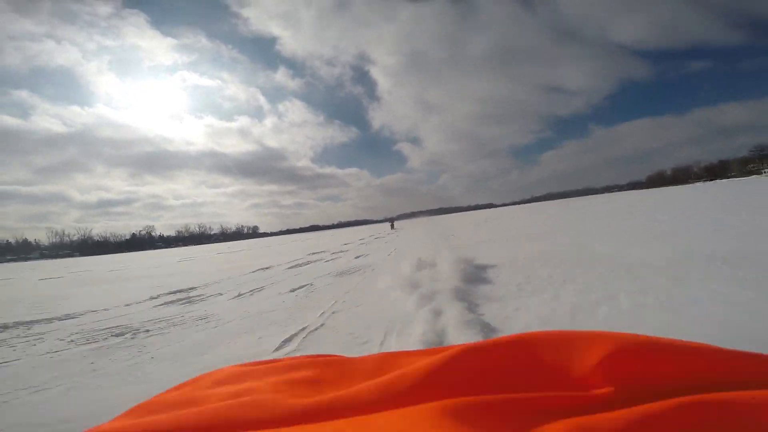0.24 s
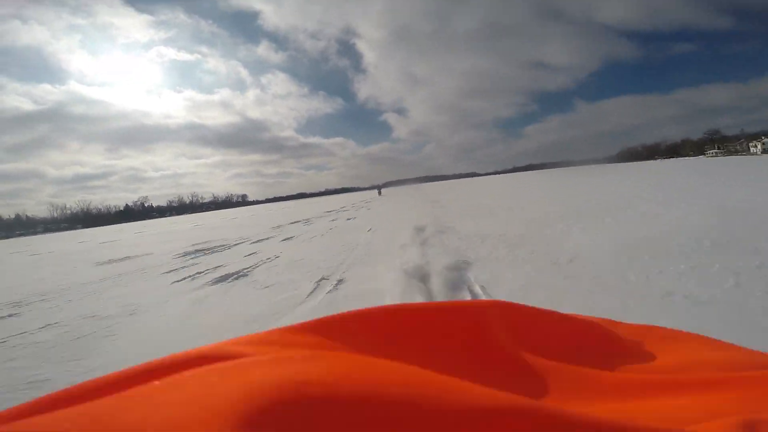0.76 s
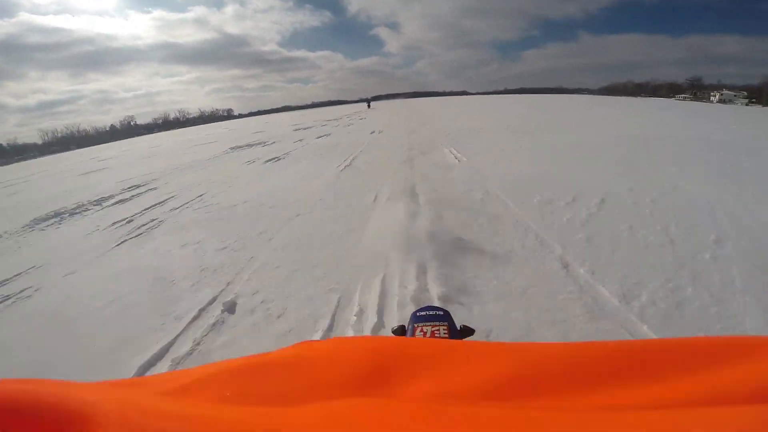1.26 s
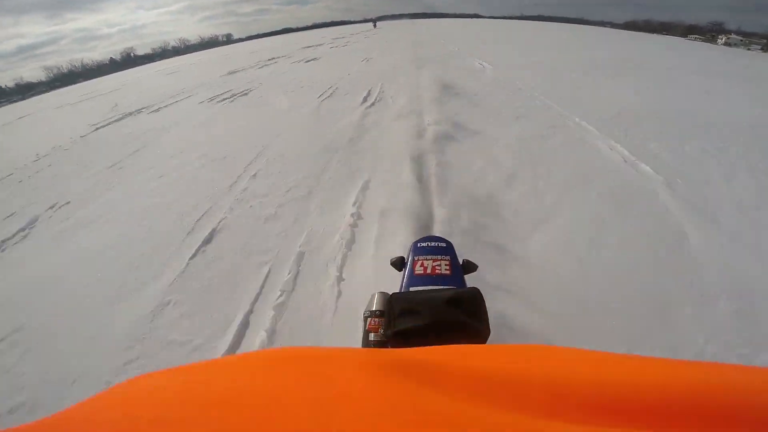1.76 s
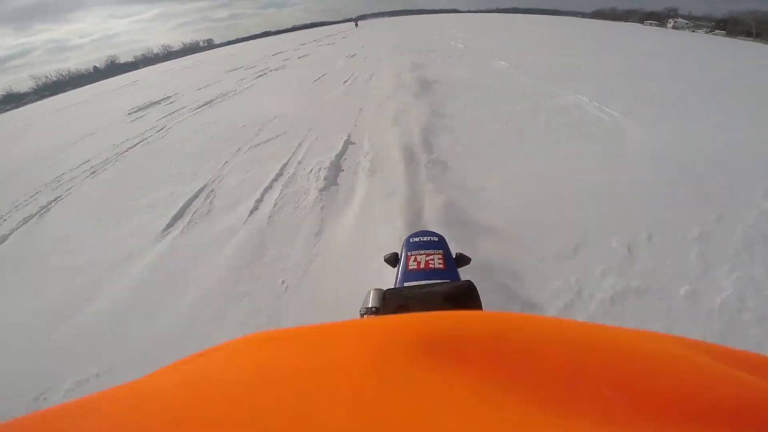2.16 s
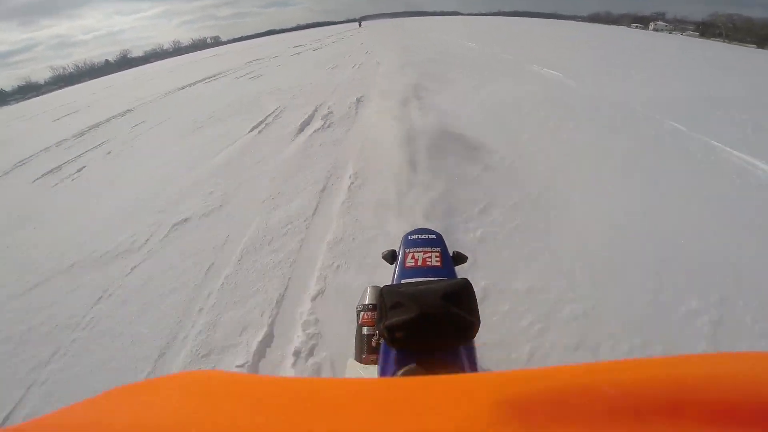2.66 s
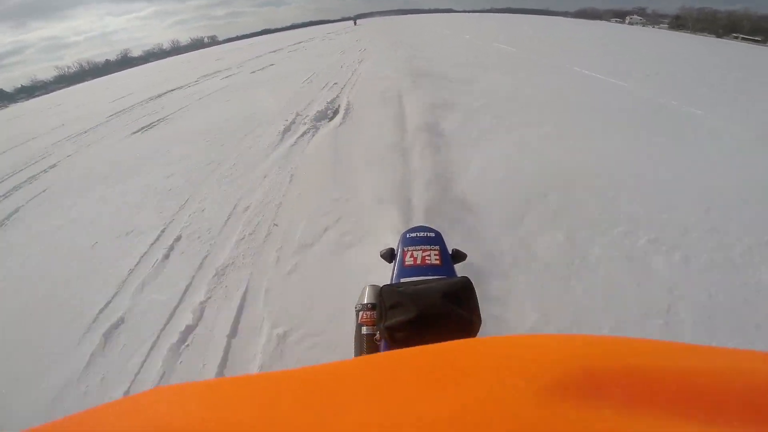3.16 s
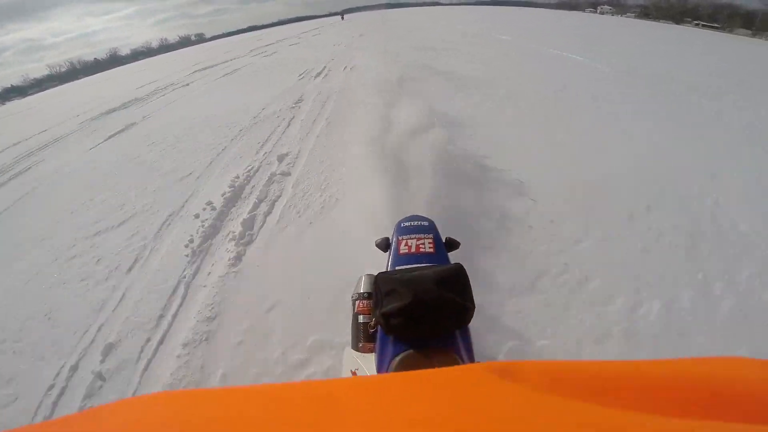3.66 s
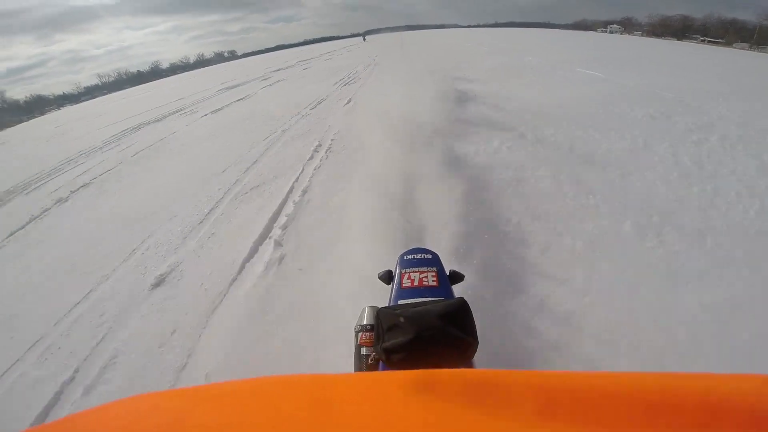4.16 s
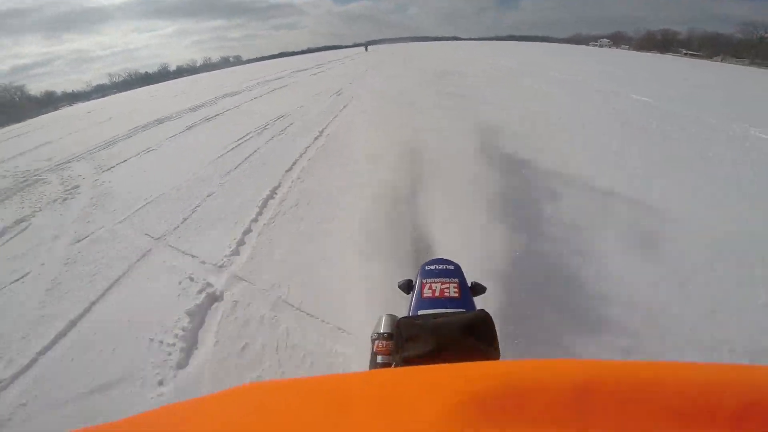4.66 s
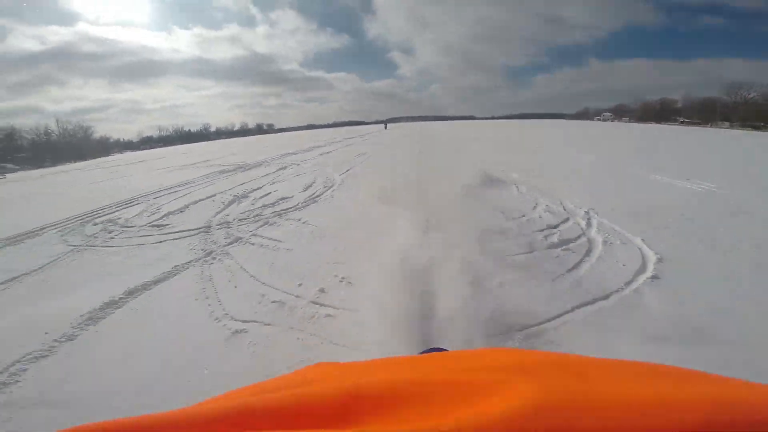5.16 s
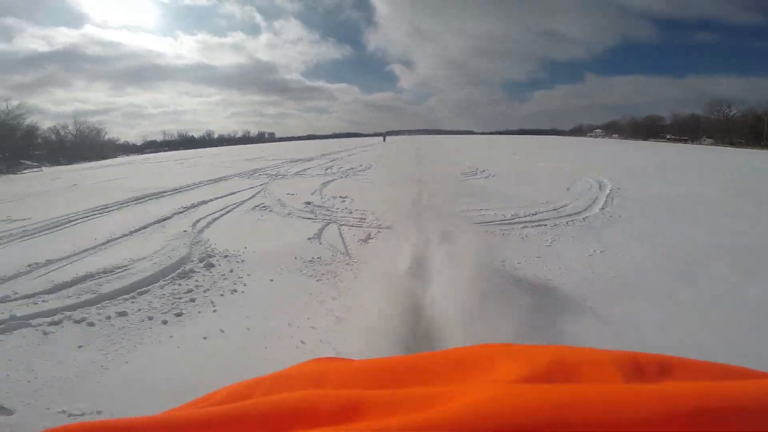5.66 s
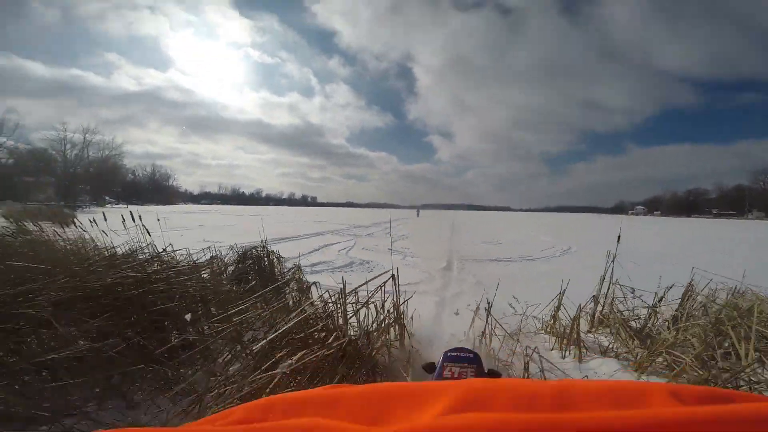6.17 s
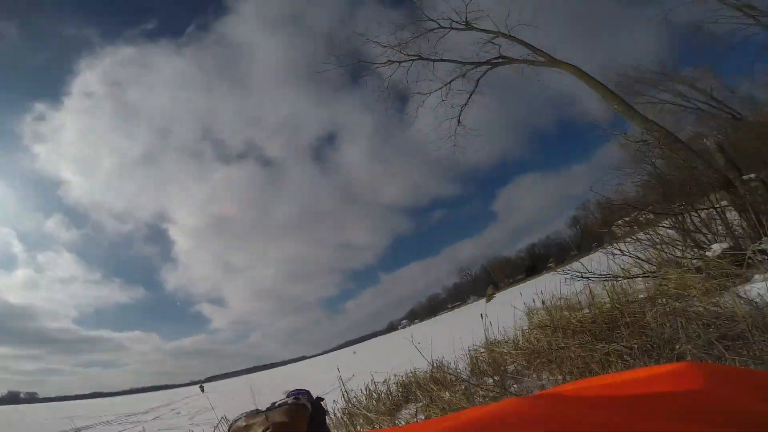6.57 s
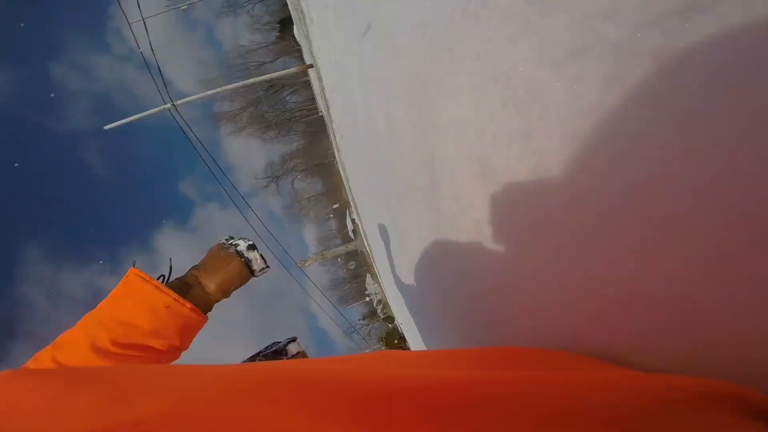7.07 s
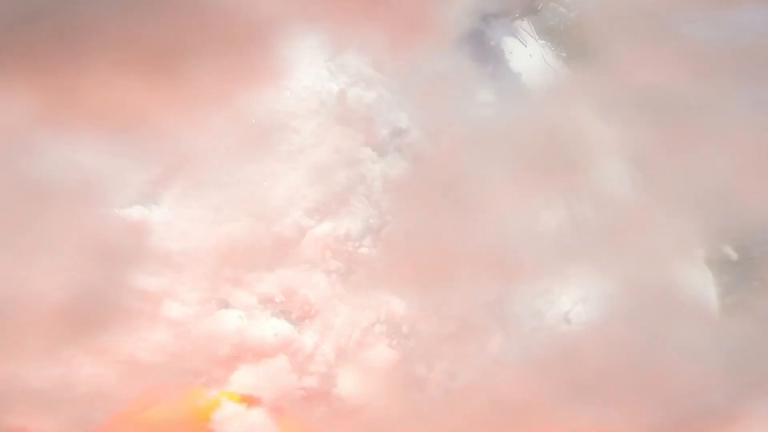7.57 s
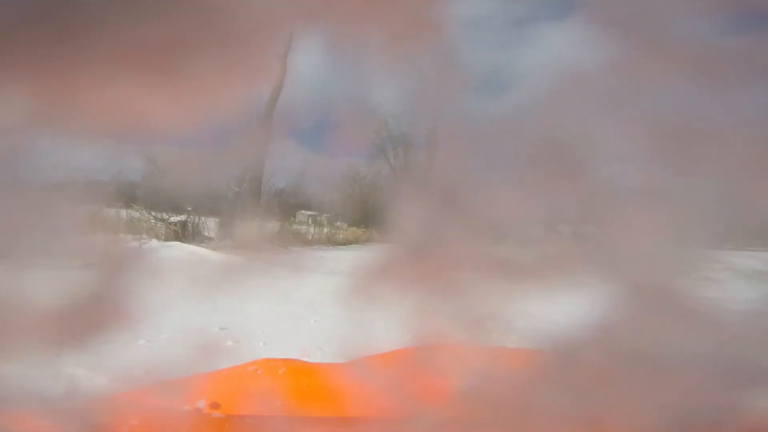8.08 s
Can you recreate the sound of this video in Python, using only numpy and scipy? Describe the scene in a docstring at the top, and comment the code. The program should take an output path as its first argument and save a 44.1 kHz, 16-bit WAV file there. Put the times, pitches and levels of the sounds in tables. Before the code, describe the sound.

Heavy wind buffets a microphone worn on the back of a rider coasting a small motorbike across a frozen lake. A stiff jacket crackles, something loose taps the plastic case, and snow hisses under the tyres. The wind eases, the engine putters and revs up, and dry reeds swish past. Sharp knocks and a short groan lead to a crunching fall into snow and a fading slide.

```python
"""Motorbike fall on a frozen lake

A small motorbike coasts fast over snowy ice, a cased camera on the rider's back. Turbulent air buffets
the case, the jacket rubs it, snow sprays on it and something loose taps it, exciting its modes.
The engine's firings quicken and ring the exhaust pipe as the bike jolts through the reeds of the bank.
The rider is thrown, lands in snow whose crust fractures in many small snaps, and slides to rest."""
import sys
import numpy as np
from scipy import signal
from scipy.fft import rfft, irfft, next_fast_len
from scipy.io import wavfile
from scipy.ndimage import uniform_filter1d, map_coordinates

SR = 44100
rng = np.random.default_rng(int(sys.argv[2]) if len(sys.argv) > 2 else 0)


def materialize(psi):
    """Save the field psi as 16-bit PCM at rate SR to the path in sys.argv[1].

    A 1-D psi becomes a single channel; in a 2-D psi each row is a channel.
    """
    bounded = np.clip(np.atleast_2d(psi).T, -1, 1)
    quanta = np.round(bounded * 32767).astype(np.int16)
    wavfile.write(sys.argv[1], SR, quanta)


N = 367217
TIME = np.arange(N) / SR
LANDING_S = 7.186

# Airflow over the case, dropping as the bike slows: time_s, level_db
AIRFLOW = [(0, -21.5), (.75, -15), (1.12, -21), (1.5, -16.5), (1.95, -18), (2.75, -14.5), (3.1, -18.5),
           (3.5, -23), (3.85, -30), (4.7, -36), (5.35, -39), (5.78, -43.5), (6.22, -27.5), (6.52, -42.5),
           (7.35, -43.5), (7.85, -59.5), (8.33, -48)]
# Lurches of the rider that push air at the case: centre_s, level_db, half_width_s
LURCHES = [(4.844, -22.5, 0.21), (5.16, -16, 0.044), (5.67, -26.5, 0.099), (6.166, -24, 0.081),
           (7.065, -28.5, 0.18), (7.456, -20.5, 0.026), (7.67, -30, 0.024), (8.194, -27.5, 0.088)]
# Slaps and lulls of large eddies: centre_s, gain_db
SLAPS = [(.04, 11), (.068, -12), (1.52, 11.5), (1.77, 4.5), (2.4, 2.5), (3.053, 7.5), (3.511, 13.5),
         (5.15, 7)]
# Spectra of the turbulence: frequency_hz, relative_db
GUST_SPECTRUM = [(8, -5), (18, 3.5), (35, -3), (55, -11), (90, -20.5), (200, -88.5)]
EDDY_SPECTRUM = [(22, -18), (40, -5.5), (65, 0), (100, 0), (150, 2.5), (200, -6.5), (260, -15),
                 (340, -14.5), (480, -27.5), (700, -58), (1500, -83)]

# Modes of the case, its hollow mount and the exhaust pipe: pitch_hz, level_db, t60_s
CASE_MODES = [(277, -5, 0.017), (422, -10.5, 0.018), (590, -22.5, 0.027), (1126, -22.5, 0.017),
              (1410, -13, 0.019), (1643, 1, 0.0035), (2160, -20, 0.12), (2250, -15.5, 0.022),
              (2276, -1.5, 0.011), (2680, -15.5, 0.023), (3070, -5, 0.0061), (4700, -13.5, 0.0063),
              (5890, -11, 0.0036), (10200, -21.5, 0.0018), (11540, -25, 0.0033)]
MOUNT_MODES = [(124.6, 0.5, 0.1), (296, 2.5, 0.079), (827, -4.5, 0.058)]
PIPE_MODES = [(135, -9, 0.04), (271, 3, 0.03), (445, -3, 0.023), (570, -14, 0.019)]
# Heavy jolts and the knocks of the fall:
# start_s, level_db, thud_db, clack_db, snap_db, mount_db, wall_hz, wall_db, wall_t60_s
JOLTS = [(.938, -15.5, 4, 19.5, 0, -30, 1160, -25, 0.0054),
         (5.125, -13, -18, 0.5, -5, -34, 3230, -22, 0.028), (5.457, -32.5, 19, 9, -2, -36, 1400, -44, .02),
         (6.2138, -16.5, 18.5, 10, -18, -21.5, 1900, -15, 0.023),
         (6.3138, -7.5, -6, 8, -7, -15, 1380, -4, 0.023), (6.4147, -4.5, 6, 6.5, -6, -24, 1970, -12, 0.024),
         (6.422, -21, 1, 12, -14, -31, 1230, -23, 0.044),
         (6.7053, -14.5, 7, 4.5, -35, -37, 2050, -12.5, 0.021),
         (6.716, -16, -10, 8, -30, -35, 2160, -18.5, 0.053),
         (6.9847, -18.5, -2, 5, -19, -38, 1870, -3, 0.0085),
         (7.0372, -5, -2, 4.5, -11, -17, 1580, -17, 0.038),
         (7.155, 0.5, -1, -6.5, -14.5, -21, 2120, -13, 0.0086),
         (7.2019, -0.5, -14, 0, 9, -35, 1960, -17, 0.012), (7.2028, -11, 12, 18, 21, -38, 2480, -2, 0.027),
         (7.4363, -7.5, 4, 4, 1, -30, 2240, 2, 0.0048), (7.633, -25.5, 2, 10, 3, -50, 2470, -21, 0.016)]
# Something loose tapping the case: start_s, level_db, snap_db
TAPS = [(.677, -9.5, 3), (1.193, -17.5, -3), (1.561, -13.5, -8), (1.621, -19.5, -18), (1.669, -18, -17),
        (1.7145, -15.5, -15), (1.782, -16.5, 3), (1.822, -20.5, -19), (1.870, -14.5, -20),
        (1.933, -18.5, 6), (1.975, -12, -12), (2.046, -25.5, 1), (2.092, -10, -12), (2.2548, -12, 3.5),
        (2.3086, -13, -4), (2.415, -14.5, 1), (5.181, -23.5, 4)]
# Ice chips striking the case: start_s, level_db
ICE_CHIPS = [(4.8683, -31), (4.9717, -35), (5.0092, -37), (5.2696, -38), (5.3205, -45), (5.3319, -32.5),
             (5.3363, -23), (5.35, -40), (5.447, -36), (5.7384, -29), (5.752, -40), (5.811, -36),
             (5.816, -28.5), (7.528, -30.5), (7.808, -40), (7.8864, -34.5)]

# Speed of the single-cylinder engine: time_s, firing_rate_hz
FIRING_RATE = [(5.653, 13.7), (5.79, 16.5), (5.895, 21.8), (6.01, 30.2), (6.14, 38), (6.22, 44),
               (6.35, 45.5), (6.85, 36)]
# Strength of the exhaust pulses: time_s, level_db
THROTTLE = [(5.65, -35.5), (5.845, -24.5), (6.19, -18.5), (6.25, -21), (6.41, -27), (6.46, -44), (7.2, -43)]
# Spectrum of a puff of exhaust gas: frequency_hz, relative_db
PUFF_SPECTRUM = [(100, -15), (250, -10), (490, -5), (620, -20), (950, -39)]

# The rider's weight packing the snow at each bounce and roll: start_s, level_db, hold_s
BOUNCES = [(7.195, -15.5, 0.0054), (7.196, -26, 0.0033), (7.244, -22, 0.058), (7.399, -33, 0.07),
           (7.603, -46.5, 0.025), (8.005, -46.5, 0.1), (8.112, -34, 0.021), (8.18, -40.5, 0.02)]
# Spectra of breaking crust, powder and the body's thump: frequency_hz, relative_db
CRUST_SPECTRUM = [(100, -9.5), (270, -4.5), (600, -16.5), (1000, -9.5), (1500, -4.5), (2150, 0),
                  (3000, -10), (4400, -15.5), (6000, -14), (8000, -26), (15000, -29)]
POWDER_SPECTRUM = [(3000, 3), (6500, 4), (10000, -1), (15000, -13)]
THUMP_SPECTRUM = [(30, 4.5), (80, -1), (140, 3.5), (230, -6.5), (300, -2.5), (480, -16.5), (900, -60)]

# Single rubs of the jacket on the case: centre_s, level_db, length_s
RUBS = [(1.148, -25.5, 0.012), (1.214, -22.5, 0.017), (1.266, -36, 0.04), (1.457, -25.5, 0.024),
        (1.578, -27, 0.016), (2.849, -37, 0.039), (3.207, -32.5, 0.04), (3.232, -31.5, 0.017),
        (3.358, -35, 0.06), (3.469, -34, 0.081), (3.74, -37, 0.044), (3.825, -34, 0.052),
        (3.883, -35.5, 0.062), (3.954, -31.5, 0.078), (4.865, -40, 0.043), (4.93, -33, 0.033),
        (4.987, -41, 0.027), (5.061, -37, 0.058), (5.25, -40.5, 0.075), (6.355, -38, .016),
        (6.413, -25.5, 0.03), (7.111, -26.5, 0.017)]
# Stiff folds snapping against the case: start_s, level_db
FOLD_SNAPS = [(0.4952, -22), (.5633, -26), (.7429, -21), (0.8603, -20), (.896, -14), (1.0341, -17),
              (1.098, -24), (1.1932, -16.5), (1.249, -18), (1.302, -24.5), (1.348, -25), (1.364, -24),
              (1.427, -17), (1.4497, -23), (1.4707, -25)]
# Spectra of flapping and rubbing cloth: frequency_hz, relative_db
FLAP_SPECTRUM = [(150, 3.5), (300, 8.5), (430, 3), (600, -4.5), (1080, -10), (1420, 1), (1900, -1.5),
                 (2150, -0.5), (2450, -2.5), (3300, -7.5), (4250, -18), (4650, -19), (5100, -22.5),
                 (5780, -13), (7100, -21), (8200, -27), (10000, -24.5), (15000, -41)]
RUB_SPECTRUM = [(500, -28), (1080, -10), (1400, 9.5), (1800, 4), (2150, 2), (2600, 2.5), (3300, -1.5),
                (4100, -14.5), (5200, -23), (5950, -10), (7000, -26), (12000, -46)]

# Groan of the riderless bike ploughing into the bank: time_s, level_db, pitch_hz
GROAN = [(6.85, -55, 259), (6.97, -46, 255), (6.99, -36, 268), (7.03, -22, 295), (7.065, -35, 286),
         (7.085, -33, 314), (7.125, -28, 344), (7.148, -66, 340)]
# Dry reeds sweeping along bike and case: time_s, level_db
REED_SWEEP = [(5.75, -83), (5.9, -51.5), (6.02, -42.5), (6.17, -33.5), (6.24, -38.5), (6.28, -31),
              (6.33, -39), (6.4, -38), (6.48, -63)]
# Spectra of scratching reeds and a skidding tyre: frequency_hz, relative_db
REED_SPECTRUM = [(590, -8), (1000, -8.5), (1560, -0.5), (1950, -1), (2260, -0.5), (2600, -8), (3100, -5),
                 (3850, -16.5), (4620, -12.5), (5170, -19), (6060, -10.5), (7000, -21), (7950, -30),
                 (8800, -23), (10000, -23), (15000, -37)]
SKID_SPECTRUM = [(250, -18), (430, 5), (530, 11.5), (650, 7), (780, 3), (1150, -5), (1430, -3), (2200, -7),
                 (3700, -16), (4600, -9), (5300, -19), (6800, -12), (8100, -34), (10000, -35), (15000, -56)]

# Tyres running through snow: time_s, roar_db, spray_db
SNOW_RUN = [(1.7, -45.5, -44), (2.65, -43.5, -38.5), (3.0, -38.5, -42.5), (3.45, -43.5, -43),
            (3.85, -43, -45.5), (4.1, -41, -49.5), (4.75, -49, -51.5), (5.08, -44, -48.5),
            (5.33, -51, -49.5), (5.8, -54.5, -50.5), (6.7, -58.5, -51), (6.95, -59, -45),
            (7.08, -58, -38.5)]
# Brushes through drifts: start_s, end_s, hiss_db, fizz_db
DRIFTS = [(3.626, 3.67, -65, -46.5), (4.923, 5.218, -60, -63)]
# Spectra of tyre roar, coarse spray and fine spray: frequency_hz, relative_db
ROAR_SPECTRUM = [(150, -6.5), (300, 4), (520, 0), (680, -3), (850, -3.5), (1100, -16), (1800, -69),
                 (4000, -83)]
HISS_SPECTRUM = [(500, -20), (1080, -2), (1380, 4.5), (1800, 4), (2130, 3), (2500, -2), (3000, -5),
                 (3900, -13), (4600, -10.5), (5200, -21.5), (5950, -11), (7000, -18), (8000, -28.5),
                 (12000, -54)]
FIZZ_SPECTRUM = [(2500, -17), (5000, 7.5), (6800, -3), (8300, -9), (10000, -5), (12500, -11.5),
                 (15000, -17)]


def wind(suction=0.09, lumpy_db=3, gust_over_db=8, gust_limit_db=-23.5, slap_half_s=0.015):
    """Turbulence: slow gusts and eddies shed by the rider vary the pressure on the case."""
    gusts = steadied(noise(GUST_SPECTRUM), size=6000)
    eddies = noise(EDDY_SPECTRUM) * gain_of(lumpy_db * (wander(rate_hz=14) + wander(rate_hz=47)))
    eddies = steadied(eddies, size=6000)
    eddies = unit_rms(eddies - suction * (eddies ** 2 - 1))  # suction peaks are the sharper ones
    airflow = gain_of(follow(AIRFLOW))
    gusting = 1 / (1 / (airflow * gain_of(gust_over_db)) + 1 / gain_of(gust_limit_db))
    lurching = sum(gain_of(db) * np.exp(-((TIME - s) / half) ** 2) for s, db, half in LURCHES)
    slaps_db = sum(db * np.exp(-((TIME - s) / slap_half_s) ** 2) for s, db in SLAPS)
    pressure = gusts * np.hypot(gusting, lurching) + eddies * gain_of(slaps_db) * airflow
    return np.tanh(pressure)  # strong wind overloads the microphone, softly flattening the peaks


def impacts(chatter=0.075, chatter_s=0.0035, boost_db=2.5, wall_rise_s=0.00093, size=8192):
    """Impulse excitation: a push and brief chatter ring the case, its mount and often one wall."""
    out, t = np.zeros(N), np.arange(size) / SR
    # Light strikes, in the columns of JOLTS, hardly stir the mount; chips ring no wall.
    taps = [(s, db, -19, 2.5, snap_db, -80, 2175, db - 4.5, 0.016) for s, db, snap_db in TAPS]
    chips = [(s, db, -18, -46, 16, -80) for s, db in ICE_CHIPS]
    for s, db, thud_db, clack_db, snap_db, mount_db, *wall in JOLTS + taps + chips:
        # Each point of contact weights the modes differently.
        case = ring([(hz, level + rng.standard_normal(), t60) for hz, level, t60 in CASE_MODES])
        if s > LANDING_S:
            case *= np.exp(-t / 0.0032)  # damped by packed snow
        elif s < FIRING_RATE[0][0]:
            case *= np.exp(-t / 0.046)  # damped by the rider's back
        push = (t == 0) + chatter * rng.standard_normal(size) * np.exp(-t / chatter_s)
        struck = unit_rms(signal.fftconvolve(push, case)[:size]) * case.std()
        tone = [(450, thud_db), (900, clack_db - 0.5), (1400, clack_db), (2000, 0), (4500, 0),
                (8500, snap_db), (16000, snap_db)]
        knock = gain_of(db + boost_db) * toned(struck, tone) / abs(case).max()
        add(out, s, knock + gain_of(mount_db) * ring(MOUNT_MODES))
        if wall:
            add(out, s, ring([wall]) * (1 - np.exp(-t / wall_rise_s)))
    return out


def engine(stall_s=7.25, uneven_db=0.5, puff_db=-15, puff_s=0.0061, echo=0.45, echo_s=0.00633):
    """Pipe resonance: each firing rings the exhaust, reflects inverted from its end and puffs out gas."""
    running = (TIME >= FIRING_RATE[0][0]) & (TIME < stall_s)
    cycles = np.cumsum(follow(FIRING_RATE) * running) / SR
    strength = gain_of(follow(THROTTLE) + uneven_db * rng.standard_normal(N))
    firings = np.diff(np.ceil(cycles), prepend=0) * strength
    pulses = firings - echo * np.roll(firings, round(echo_s * SR))
    muffled_pipe = toned(ring(PIPE_MODES), [(520, -15), (900, -7), (2500, -19)])
    knocks = signal.oaconvolve(pulses, muffled_pipe / abs(muffled_pipe).max())[:N]
    outflow = signal.lfilter([1], [1, -np.exp(-1 / (puff_s * SR))], firings)
    return knocks + gain_of(puff_db) * outflow * noise(PUFF_SPECTRUM)


def snow_crunch(slide_db=-40, slowing_db_per_s=64, creak_db=-53.5, thump_db=-16):
    """Brittle fracture: crust snaps under the rider, brighter with more load, over the body's thump."""
    slide = gain_of(slide_db - slowing_db_per_s * np.maximum(TIME - LANDING_S, 0)) + gain_of(creak_db)
    bounces = sum(gain_of(db) * swell(s, s + hold, rise_s=0.0074, fall_s=0.046)
                  for s, db, hold in BOUNCES)
    load = np.hypot(slide, bounces) * (TIME >= LANDING_S)
    crust = friction(CRUST_SPECTRUM, grit=0.86, slip_db=3, slip_hz=148.6, per_s=1700)
    powder = friction(POWDER_SPECTRUM, grit=1.1, slip_db=4, slip_hz=106)
    thump = steadied(noise(THUMP_SPECTRUM), size=1500)
    return load * (crust + powder * load ** 0.54) + thump * gain_of(thump_db) * bounces ** 0.6


def jacket_flap(peak_s=0.8, end_s=1.62, level_db=-20, rise_db_per_s=8.5, fall_db_per_s=18):
    """Intermittent contact: stiff cloth crackles on the case, swelling and then fading fitfully."""
    before_s, after_s = np.maximum(peak_s - TIME, 0), np.clip(TIME - peak_s, 0, 1)
    fitful_db = 6.5 * after_s * wander(rate_hz=35)  # the cloth loses touch more and more
    contact = gain_of(level_db - rise_db_per_s * before_s - fall_db_per_s * after_s + fitful_db)
    cloth = friction(FLAP_SPECTRUM, grit=1.33, slip_db=1.5, slip_hz=148.3, per_s=800)
    cloth = spattered(cloth, patch_db=3)
    creases = coloured(grains(per_s=93, spread_db=1.5), HISS_SPECTRUM)
    return contact * (cloth + creases * gain_of(-9)) * (TIME < end_s)


def jacket_rubs(slip_db=3, slip_hz=90):
    """Sliding friction: short rubs of cloth flutter as they slip, each with its own spectrum."""
    out = np.zeros(N)
    for s, db, length_s in RUBS:
        size = round(length_s * SR)
        spectrum = varied(RUB_SPECTRUM)
        phase = np.cumsum(rng.uniform(0, 4 * np.pi * slip_hz / SR, size)) + rng.uniform(0, 2 * np.pi)
        rub = unit_rms(noise(spectrum, 8192)[:size] * gain_of(slip_db * np.sin(phase)))
        add(out, s - length_s / 2, gain_of(db) * rub * np.hanning(size))
    return out


def jacket_snaps(t60_s=0.039, size=4096):
    """Sudden release: a stiff fold lets go in a burst of noise that decays exponentially."""
    out, t = np.zeros(N), np.arange(size) / SR
    for s, db in FOLD_SNAPS:
        add(out, s, noise(varied(FLAP_SPECTRUM), size) * gain_of(db - 60 * t / t60_s))
    return out


def plough(judder_hz=150, judder_db=-4):
    """Forced vibration: slips through snow drive a rising resonance of the bike and a lower judder."""
    slips = rng.standard_normal(N)
    groan = steadied(resonate(slips, follow(GROAN, 2), width_hz=90), size=1200)
    judder = steadied(resonate(slips, np.full(N, judder_hz), width_hz=80), size=1500)
    return (groan + gain_of(judder_db) * judder) * envelope(GROAN)


def reeds():
    """Dry friction: thousands of stalks scratch past and merge into a bright swish."""
    return friction(REED_SPECTRUM, grit=0.52, slip_db=2, slip_hz=72) * envelope(REED_SWEEP)


def skid(start_s=3.556, hold_s=0.083, level_db=-30):
    """Sliding friction: a tyre grinds briefly over rough ice."""
    grind = friction(SKID_SPECTRUM, grit=0.37, slip_db=2.5, slip_hz=86.1)
    return grind * gain_of(level_db) * swell(start_s, start_s + hold_s, rise_s=0.025, fall_s=0.043)


def snow_spray(clump_db=2.4, flutter_db=2.5, fizz_under_db=18, fizz_follow=0.19):
    """Random impacts sum to noise: roaring tyres throw snow and ice at the case until the rider lands."""
    clumps = gain_of(clump_db * wander(rate_hz=13) + flutter_db * wander(rate_hz=57))
    roar = noise(ROAR_SPECTRUM) * gain_of(follow(SNOW_RUN) + 1 + flutter_db * wander(rate_hz=30))
    hiss = coloured(rng.standard_normal(N) + 0.5 * grains(per_s=1900, spread_db=4), HISS_SPECTRUM)
    fizz = coloured(rng.standard_normal(N) + 0.83 * grains(per_s=230, spread_db=2.5), FIZZ_SPECTRUM)
    spray_db = follow(SNOW_RUN, 2)
    # Fine powder follows only a share of the changes in the spray.
    powder_db = fizz_follow * spray_db + (1 - fizz_follow) * spray_db.mean() - fizz_under_db
    thrown = hiss * gain_of(spray_db - 1) + fizz * gain_of(powder_db)
    for start_s, end_s, hiss_db, fizz_db in DRIFTS:
        brush = swell(start_s, end_s, rise_s=0.1, fall_s=0.062)
        thrown += brush * (hiss * gain_of(hiss_db) + fizz * gain_of(fizz_db))
    riding = np.interp(TIME, [7.14, 7.25], [1, 0])
    return (roar + thrown * clumps) * riding


def snow_pellets(tick_db=-8, hollow_db=-13, hollow_hz=2160, width_hz=130):
    """Resonance of the case: lumps of snow ring its modes, and the steady stream sounds its hollow."""
    ticks = unit_rms(signal.oaconvolve(grains(per_s=50, spread_db=1.5), ring(CASE_MODES))[:N])
    cavity = signal.iirpeak(hollow_hz, hollow_hz / width_hz, SR)
    hollow = unit_rms(signal.lfilter(*cavity, noise(HISS_SPECTRUM)))
    stream = gain_of(follow(SNOW_RUN, 2)) * (TIME < LANDING_S)
    return (ticks * gain_of(tick_db) + hollow * gain_of(hollow_db)) * stream


def friction(spectrum, grit, slip_db, slip_hz, per_s=3000):
    """Stick-slip motion: noise and dense little snaps come in uneven surges."""
    snaps = coloured(rng.standard_normal(N) + grit * grains(per_s, spread_db=-1.5), spectrum)
    return steadied(snaps * gain_of(slip_db * wander(rate_hz=slip_hz)), size=1500)


def grains(per_s, spread_db):
    """Shot noise: sparse clicks of random sign and size, at rms 1."""
    strength = gain_of(spread_db * np.minimum(rng.exponential(1, N), 4))
    return unit_rms(strength * rng.choice([-1, 1], N) * (rng.random(N) < per_s / SR))


def ring(modes, size=8192):
    """Impulse response of a body: damped modes, neighbours in opposite phase."""
    t = np.arange(size) / SR
    return sum((-1) ** k * gain_of(db - 60 * t / t60) * np.sin(2 * np.pi * hz * t)
               for k, (hz, db, t60) in enumerate(modes))


def resonate(x, hz, width_hz):
    """Two resonators in cascade, both following the curve hz; rms 1."""
    carrier = np.exp(2j * np.pi * np.cumsum(hz) / SR)
    pole = np.exp(-np.pi * width_hz / SR)
    for _ in range(2):
        x = 2 * (carrier * signal.lfilter([1 - pole], [1, -pole], x / carrier + 1e-18)).real
    return unit_rms(x)


def spattered(x, patch_db, size=256):
    """Random modulation in time and frequency breaks a hiss into brief spatters."""
    spectra = signal.stft(x, nperseg=size)[2]
    patches = uniform_filter1d(rng.standard_normal(spectra.shape), size=3, axis=0)
    patches = unit_rms(uniform_filter1d(patches, size=2, axis=1))
    return unit_rms(signal.istft(spectra * gain_of(patch_db * patches), nperseg=size)[1][:N])


def noise(spectrum, size=N):
    """Gaussian noise with this spectrum, at rms 1."""
    return coloured(rng.standard_normal(size), spectrum)


def varied(spectrum, spread_db=2):
    """A spectrum with each level shifted at random."""
    return [(hz, db + spread_db * rng.standard_normal()) for hz, db in spectrum]


def coloured(x, spectrum):
    """Zero-phase filtering by a spectrum; rms 1."""
    size = next_fast_len(len(x))
    gain = response(spectrum, np.fft.rfftfreq(size, 1 / SR))
    return unit_rms(irfft(rfft(x, size) * gain, size)[:len(x)])


def toned(x, spectrum):
    """Minimum-phase filtering, which keeps an attack causal."""
    log_gain = np.log(response(spectrum, abs(np.fft.fftfreq(len(x), 1 / SR))))
    return np.fft.ifft(np.fft.fft(x) * np.exp(np.conj(signal.hilbert(log_gain)))).real


def response(spectrum, hz):
    """Gain at hz, interpolated in decibels over log frequency."""
    knots_hz, db = np.transpose(spectrum)
    return gain_of(np.interp(np.log(hz + 1), np.log(knots_hz + 1), db))


def wander(rate_hz):
    """Smooth random fluctuation at about this rate; rms 1."""
    knots = rng.standard_normal(4000)
    return unit_rms(map_coordinates(knots, [TIME * 2 * rate_hz], order=2, mode="wrap"))


def swell(start_s, end_s, rise_s, fall_s):
    """A gain that is full from start to end, and 20 dB down rise_s before and fall_s after."""
    away = np.maximum(start_s - TIME, 0) / rise_s + np.maximum(TIME - end_s, 0) / fall_s
    return gain_of(-20 * np.minimum(away, 10))


def envelope(rows):
    """Amplitude along a level curve, zero outside its span."""
    return gain_of(follow(rows)) * (TIME > rows[0][0]) * (TIME < rows[-1][0])


def follow(rows, column=1):
    """One column of a curve, sample by sample."""
    rows = np.array(rows)
    return np.interp(TIME, rows[:, 0], rows[:, column])


def steadied(x, size):
    """Divides a noise by its running rms over size samples."""
    return x / np.sqrt(abs(uniform_filter1d(x ** 2, size)) + 1e-9)


def unit_rms(x):
    """Scales to rms 1."""
    return x / np.sqrt(np.mean(x ** 2) + 1e-20)


def gain_of(db):
    """Decibels to amplitude."""
    return 10 ** (np.asarray(db) / 20)


def add(mix, start_s, sound):
    """Mixes a sound in at start_s."""
    part = mix[round(start_s * SR):][:len(sound)]
    part += sound[:len(part)]


def scene():
    """Superposition: all sources sum at the one microphone."""
    ride = wind() + snow_spray() + snow_pellets() + jacket_flap() + jacket_rubs() + jacket_snaps()
    return (ride + skid() + reeds() + engine() + plough() + impacts() + snow_crunch())[None]


def record(dry):
    """Overload and band limiting: clipping at full scale, then a low-pass filter."""
    cutoff_hz = 15400
    low_pass = signal.firwin(255, cutoff_hz, window=("kaiser", 8), fs=SR)
    return signal.oaconvolve(np.clip(dry, -1, 1), low_pass[None], "same")


dry = scene()
out = record(dry)
materialize(out)
```